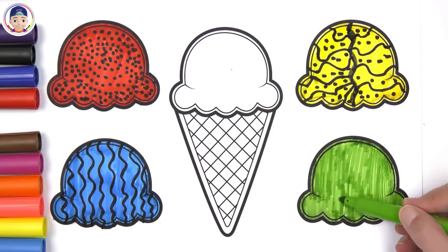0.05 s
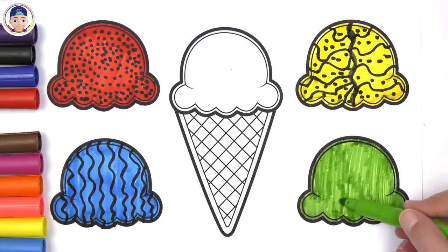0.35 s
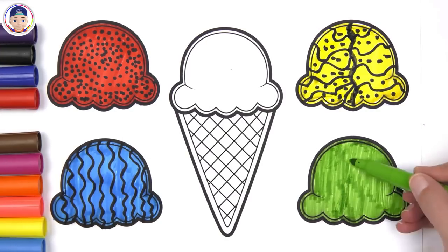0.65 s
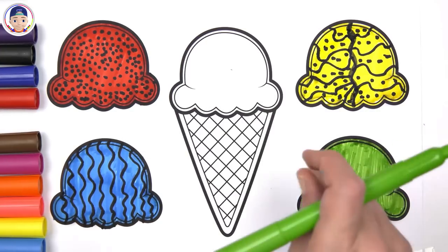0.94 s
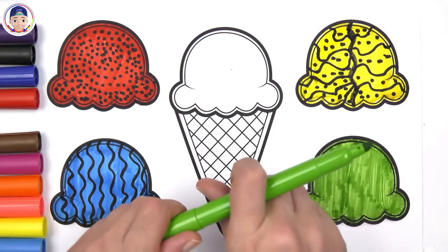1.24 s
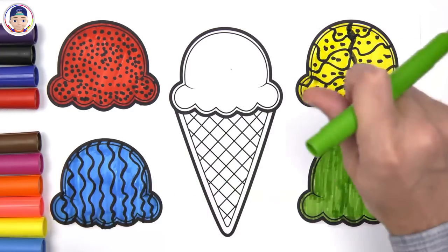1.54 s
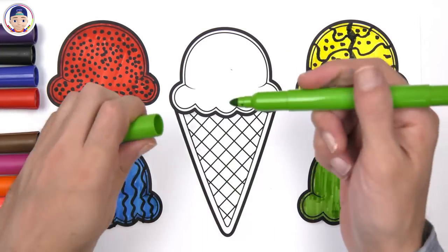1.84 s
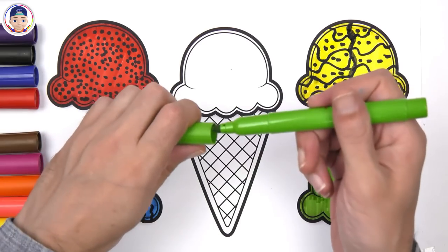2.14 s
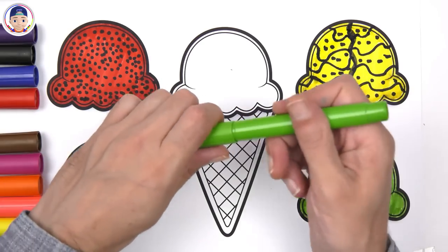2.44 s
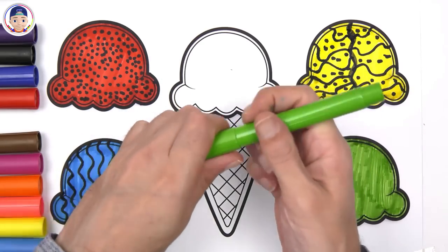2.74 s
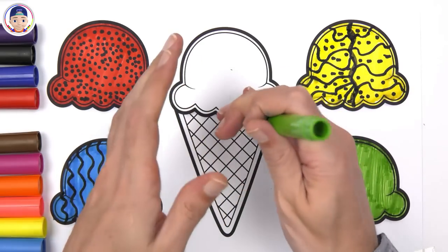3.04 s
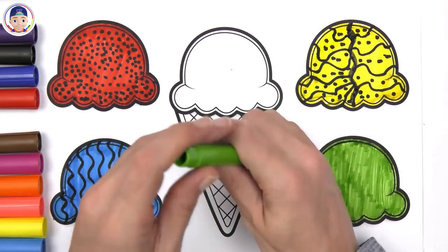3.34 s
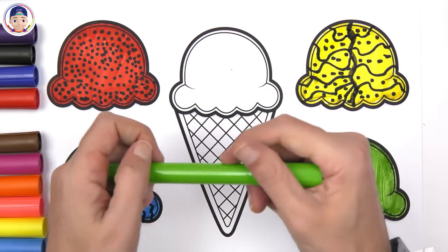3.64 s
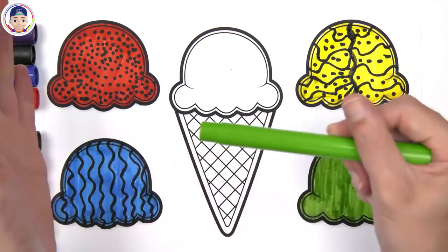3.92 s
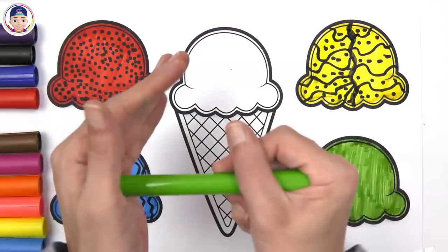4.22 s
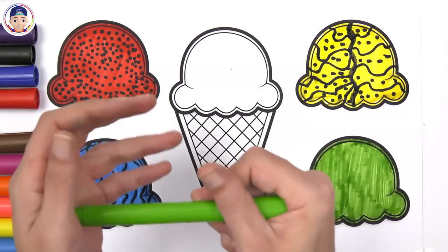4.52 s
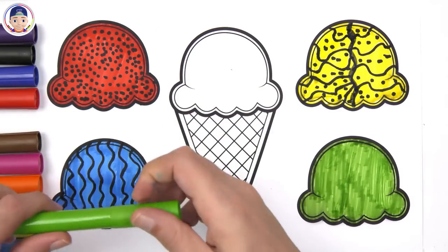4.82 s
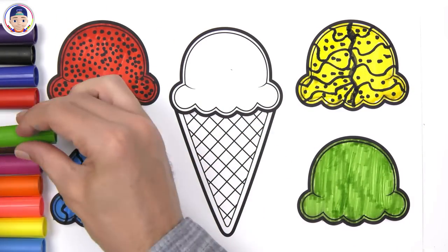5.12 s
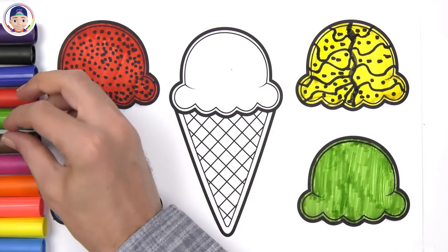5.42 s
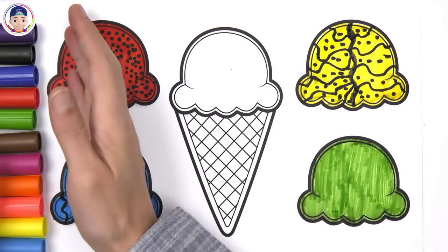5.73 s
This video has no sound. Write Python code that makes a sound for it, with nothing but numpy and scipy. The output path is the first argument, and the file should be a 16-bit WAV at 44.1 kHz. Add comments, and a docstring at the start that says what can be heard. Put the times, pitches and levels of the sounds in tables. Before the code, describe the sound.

A felt-tip marker scratches softly on paper in a few quick strokes. Its cap slips off the back with a small click and snaps sharply over the tip. The marker is rapped loudly on the table, patted three times with a palm, then dropped clattering among other markers. Hands rustle and push air across a close stereo microphone in a small room with a faint fan.

```python
"""A small room, close stereo microphone. A felt-tip marker scribbles on paper, its nib dragging over
the fibres. The cap is pulled off the back, snapped over the tip, rapped on the table and patted home
with the palm; then the marker is dropped into a row of others. Each contact rings damped modes and
echoes in the room. Hands rustle and push air across the microphone; a fan whirs faintly."""
import sys
import numpy as np
from scipy import signal
from scipy.fft import rfft, irfft
from scipy.io import wavfile
from scipy.ndimage import uniform_filter1d

SR = 44100
rng = np.random.default_rng(int(sys.argv[2]) if len(sys.argv) > 2 else 0)


def file_out(sig):
    """Save sig as 16-bit WAV at sys.argv[1]."""
    # one column per channel
    cols = np.atleast_2d(sig).T
    # limit, then scale
    lim = np.clip(cols, -1, 1)
    pcm = np.round(lim * 32767).astype(np.int16)
    wavfile.write(sys.argv[1], SR, pcm)


N = 263277
TIME_S, FREQ_HZ = np.arange(N) / SR, np.fft.rfftfreq(N, 1 / SR)

# Rubbing gestures. Each row: start in seconds, rise in seconds, hold in seconds, relative level in dB.
NIB_STROKES = [(-0.04, 0.12, 0.082, -51), (.17, 0.086, 0.08, -58), (.305, 0.067, 0.11, -51),
               (.47, 0.032, 0.13, -52), (.661, 0.022, 0.13, -50.5)]
NIB_CATCHES = [(.672, .004, .012, -50)]
CAP_SCRAPES = [(1.391, .003, .013, -55)]
SKIN_RUBS = [(1.09, 0.042, .015, -72.5), (1.545, .01, 0.0044, -63), (1.56, 0.045, 0.31, -75.5),
             (1.715, 0.0087, .004, -70), (2.56, 0.067, 0.21, -70.5), (2.74, 0.043, 0.035, -65),
             (2.84, .025, 0.0088, -61.5), (2.925, .012, .003, -68), (3.09, 0.039, 0.087, -56.5),
             (3.27, 0.014, 0.1, -58.5), (3.41, 0.038, 0.1, -60.5), (3.62, 0.053, .02, -69),
             (3.82, 0.02, .004, -63), (4.02, .02, 0.047, -59.5), (4.16, 0.034, .02, -73),
             (4.24, 0.022, 0.057, -66), (4.375, .015, .01, -68.5), (4.52, 0.018, 0.077, -66.5),
             (4.62, 0.023, 0.0044, -63.5), (4.7, 0.1, 0.024, -64.5), (5.09, .05, .14, -64)]
CLOTH_BRUSHES = [(5.42, 0.072, 0.1, -60.5), (5.645, 0.013, 0.099, -58), (5.82, 0.14, 0.049, -58)]
HEEL_BUMPS = [(.065, .017, 0.013, -31), (.8, 0.012, 0.077, -46.5), (5.625, 0.0069, 0.031, -38.5),
              (5.925, 0.052, .02, -33)]
# Faint breathy hisses (first and last row) and rising finger swishes (middle two).
# Each row: the four gesture columns, then first and last resonance in Hz.
HISSES_AND_SWISHES = [(1.68, .08, .12, -75.5, 4450, 4530), (2.818, 0.044, .014, -61, 5730, 7400),
                      (3.372, 0.041, 0.073, -68, 3900, 7100), (4.62, .15, 0.097, -68.5, 4360, 4700)]

# Blows. Each row: time in seconds, relative level in dB, contact hardness as a cutoff in Hz,
# factor on the mode frequencies, left over right in dB.
SLIP_BLOWS = [(1.3902, -32, 1470, 0.98, 2), (1.3935, -44, 12000, 0.94, -4), (1.4089, -27, 7000, 1.026, 2),
              (1.4103, -31, 14000, 1.25, -1), (3.1413, -13.5, 6640, 0.98, -3)]
SNAP_BLOWS = [(0.845, -44, 9000, 0.91, 2), (0.854, -42.5, 6000, 0.8, 2), (0.862, -47, 5000, 1.1, 2),
              (2.406, -29.5, 12000, 0.81, 0), (2.4137, -11, 6960, 1.014, -1.7),
              (2.429, -9.5, 6900, 0.97, 0.29), (2.5022, -36, 8000, 1.16, 0)]
SEAT_BLOWS = [(2.4591, -24.5, 12000, 0.87, 0), (2.464, -14.5, 8000, 0.91, -1),
              (2.4662, -33, 12000, 1.1, -1)]
RAP_BLOWS = [(3.1425, 4, 3012, 0.96, -1)]
PAT_BLOWS = [(4.0139, 0.5, 2530, 1.134, -0.61), (4.2321, 1.5, 3410, 0.97, -0.19),
             (4.4373, -2.5, 2950, 1.16, -1.2)]
DROP_BLOWS = [(5.2933, -10, 6950, 0.94, -6), (5.3146, -5.5, 6100, 0.97, -1.5),
              (5.4075, -1.5, 1450, .93, -1)]
TICK_BLOWS = [(0.856, -47.5, 9000, 1.06, 0), (2.698, -53, 5000, 0.84, 0), (2.726, -45.5, 4000, 0.47, 1),
              (2.793, -46.5, 7900, 1.05, 0.5), (3.125, -44, 5010, 0.82, -0.5),
              (3.803, -56.5, 7970, 0.97, -2), (4.087, -54, 14160, 1.2, 4), (4.298, -46.5, 14100, 1.5, 6),
              (5.335, -43, 9410, 1.0, 7), (5.3515, -46, 7060, 0.55, -6), (5.3722, -27, 6000, 0.92, -4),
              (5.378, -53, 6960, 0.65, -4), (5.4005, -25, 7000, 1.1, -2), (5.402, -21.5, 6900, 0.645, -15),
              (5.4335, -34, 7000, 0.96, -1), (5.63, -48, 3970, 0.77, -6)]

# Modes of the struck bodies. Each row: nominal frequency in Hz, relative level in dB, T60 in seconds.
BARREL_MODES = [(1000, 0, 0.012), (1800, -8, .005), (3888, 1.5, 0.011), (4470, -5.5, 0.0046),
                (5000, -2, 0.003), (7400, -3, 0.0061), (10100, -13, 0.002)]
OPEN_CAP_MODES = [(650, -23.5, 0.0173), (1820, -31, 0.0095), (2404, 2, .013), (3850, -57, 0.0094),
                  (4590, -40, 0.0048)]
SHUT_CAP_MODES = [(1307, 5, 0.0045), (1530, -1, 0.015), (2250, -0.5, 0.0055), (3860, -5.5, 0.019),
                  (5070, -3, 0.0017), (8600, -29.5, 0.00405)]
TABLE_MODES = [(114.6, -16, 0.23), (147, -10, 0.034), (240.7, -27, 0.3), (315, -6.5, 0.0084),
               (460, -14.5, 0.05), (690, -23.5, 0.14), (735, -37.5, 0.38), (818.5, 1, 0.022),
               (827, -27, 0.27), (875, -34.5, 0.059), (1168, -4.5, 0.031), (1211.6, -31.5, 0.11),
               (1460, -37.5, .2), (1596, -5.5, 0.027), (1730, -23.5, 0.041), (2100, -6.5, 0.0091),
               (2380, -18, .04), (2350, -17, 0.012), (4068, -21, 0.0024)]
PALM_MODES = [(52.7, -7.5, 0.037), (230, -16.5, 0.016), (1020, -3, 0.006), (1850, -1.5, 0.003),
              (3540, -2, 0.0016), (5950, -9.5, 0.00083)]
DROP_MODES = [(113.4, -23.5, 0.33), (205.5, -12.5, 0.11), (435, -9, 0.028), (653, -22, 0.033),
              (804, -14, 0.029), (1060, -6.5, 0.0093), (1202, -10.5, 0.035), (1594, 2.5, 0.011),
              (2290, -12.5, 0.034), (2560, -9, 0.02), (3380, 1, 0.007), (5300, -10.5, 0.011),
              (6540, -15, 0.012), (8600, -9, 0.0032)]

# Air pushed by the hand. Each row: peak time in seconds, level in dB, sway in Hz, left over right in dB.
AIR_PUFFS = [(1.467, -20.5, 9.5, 6.5), (2.472, -35.5, 26, 8), (3.139, -17.5, 29, -3.5),
             (4.014, -15.5, 15, -5.5), (4.232, -17.5, 14, -6.5), (4.437, -14.5, 18, -4),
             (5.408, -23, 64, -3), (5.65, -39.5, 37.2, -7)]

# Spectral shapes. Each row: frequency in Hz, relative density in dB.
FELT_SPECTRUM = [(1000, -3), (1900, -1.5), (2700, 2), (3500, -5.5), (4200, -2.5), (5000, 0), (6200, -4),
                 (8400, -4), (10800, -21), (11700, -4.5), (14000, -14), (16000, -16)]
SKIN_SPECTRUM = [(1500, -5.5), (2800, 0), (4500, -4), (7500, -1.5), (10500, -7), (13500, -2.5),
                 (16000, -15)]
SLEEVE_SPECTRUM = [(1120, -10.5), (1900, -6), (2000, -4.5), (4160, -5), (5200, -9), (5590, -7.5),
                   (9800, -12), (13200, -13), (16000, -20)]
RUMBLE_SPECTRUM = [(12, -54), (20, -8), (97, 2), (215, -13.5), (264, -8.5), (476, -21.5), (644, -28.5),
                   (900, -84), (1170, -30), (1980, -120)]
TABLETOP_SPECTRUM = [(50, -13), (120, 3), (190, -5.5), (380, -2), (560, -7), (800, -2.5), (1400, 0),
                     (2250, -12), (2900, -30), (6000, -44)]
FAN_SPECTRUM = [(12, -37), (20, 9), (60, -2.5), (107, -11.5), (142, -8.5), (241, -11), (270, -15.5),
                (399, -12), (459, -14), (607, -12.5), (1260, -21.5), (1660, -16), (2080, -25.5),
                (3840, -35), (16000, -47)]
ROOM_SPECTRUM = [(40, -8.5), (150, -3.5), (400, 5), (900, -5), (2500, -3), (5000, -0.5), (12000, 1.5),
                 (16000, -1)]

# Noise-driven resonances. Each row: centre in Hz, width in Hz, relative level in dB.
NIB_PEAKS = [(3500, 700, -9), (9750, 1350, -6)]
FAN_PEAKS = [(1610, 310, -81), (1537, 260, -86), (272.4, 27, -67.5)]
# Tones of the fan's whine. Each row: frequency in Hz, rms level in dB.
WHINE_TONES = [(1674, -70), (1723, -74.5)]

# Room decay. Each row: frequency in Hz, T60 in seconds.
ROOM_DECAY = [(120, 0.22), (400, 0.37), (1000, 0.38), (2700, 0.29), (7000, 0.27), (15000, 0.11)]
# Stereo likeness of the reflections. Each row: frequency in Hz, left-right correlation.
ROOM_CORRELATION = [(130, -0.44), (300, 0.18), (700, 0.74), (3000, 0.67), (7000, -0.69)]


def scribble(rasp_full_db=-50, rasp_power=1.4):
    """The nib drags over paper fibres, rasps on firm strokes and squeaks at a turn; the hand rumbles."""
    pressure = gestures(NIB_STROKES, sag_db=7, release_s=0.015)
    drag = friction(0.75, grip_db=2.5, grip_hz=49.5, grain_db=0.5)
    felt = drift_colour(colour(drag, FELT_SPECTRUM), patch_db=0.5)
    rasp = (pressure / amp(rasp_full_db)) ** (rasp_power - 1) * resonances(drag, NIB_PEAKS)
    squeak = gestures(NIB_CATCHES, sag_db=3, release_s=0.006) * unit(resonances(drag, NIB_PEAKS[:1]))
    hand_drag = friction(-0.082, grip_db=0.5, grip_hz=25, grain_db=-1)
    rumble = amp(1) * colour(hand_drag, RUMBLE_SPECTRUM)
    return sides(2.9) * (pressure * (felt + rasp) + squeak) + pressure * rumble


def cap_clicks():
    """The cap slips off the barrel, snaps over the tip and seats. Returns direct sound and room send."""
    slip = blows(SLIP_BLOWS, BARREL_MODES, crack_db=2, crack_s=0.0016, spread_rad=0.15, low_hz=629)
    snap = blows(SNAP_BLOWS, OPEN_CAP_MODES, crack_db=-17, crack_s=0.0039, spread_rad=0.088, low_hz=498)
    seat = blows(SEAT_BLOWS, SHUT_CAP_MODES, crack_db=-7, crack_s=0.0027, spread_rad=0.083, low_hz=533)
    return slip + snap + seat, amp(-15.5) * slip + amp(-14.5) * snap + amp(-13) * seat


def table_rap():
    """The capped marker strikes the table and rings its modes."""
    return blows(RAP_BLOWS, TABLE_MODES, crack_db=-28.5, crack_s=0.0048, spread_rad=0.22, low_hz=45)


def palm_pats():
    """A cupped palm pats the cap home: soft contact, short ring."""
    return blows(PAT_BLOWS, PALM_MODES, crack_db=-13, crack_s=0.002, spread_rad=0.1, low_hz=8.3, order=2)


def marker_drop():
    """The dropped marker hits the table three times."""
    return blows(DROP_BLOWS, DROP_MODES, crack_db=-7, crack_s=0.0014, spread_rad=0.49, low_hz=89)


def barrel_ticks(rattle_count=12):
    """Light contacts tick the barrel; it rattles against the other markers as it settles."""
    first_s, last_s = DROP_BLOWS[1][0], DROP_BLOWS[2][0]
    rattle = [(first_s + when * (last_s - first_s), -33 - 10 * soft, 7000, 0.56 + 0.61 * tune, -4)
              for when, soft, tune in rng.random((rattle_count, 3))]
    ticks = TICK_BLOWS + rattle
    return blows(ticks, BARREL_MODES, crack_db=2.5, crack_s=0.00052, spread_rad=0.22, low_hz=900.5)


def tabletop_shudder(t60_s=0.38, swell_s=0.0021):
    """After the rap the top and the things on it shudder in many close modes."""
    t = np.maximum(TIME_S - RAP_BLOWS[0][0], 0)
    envelope = amp(-21) * (1 - np.exp(-t / swell_s)) * decay(t, t60_s)
    return envelope * colour(stereo_noise(0.6), TABLETOP_SPECTRUM)


def stand_shake(hz=28, level_db=-19, t60_s=0.78):
    """The rap sets the microphone stand shaking."""
    t = np.maximum(TIME_S - RAP_BLOWS[0][0], 0)
    return amp(level_db) * decay(t, t60_s) * np.sin(2 * np.pi * hz * t)


def air_puffs(rise_s=0.025, fall_s=0.052):
    """Pressure builds as the hand closes in, then sways out; the channels are pushed opposite ways."""
    t, out = np.arange(-SR // 5, SR // 2) / SR, np.zeros((2, N))
    for peak_s, db, hz, pan_db in AIR_PUFFS:
        build = np.exp(-abs(t) / rise_s)
        sway = np.exp(-abs(t) / fall_s) * np.cos(2 * np.pi * hz * t)
        pressure = np.array([[1], [-1]]) * np.where(t < 0, build, sway)
        add(out, peak_s + t[0], amp(db) * sides(pan_db) * pressure)
    return out


def barrel_rubs():
    """Fingers rub the barrel; the cap scrapes along it before it pops off."""
    drag = friction(0.3, grip_db=1.5, grip_hz=45, grain_db=1)
    skin = drift_colour(colour(drag, SKIN_SPECTRUM), patch_db=1.5)
    fingers = gestures(SKIN_RUBS, sag_db=4, release_s=0.022)
    cap = gestures(CAP_SCRAPES, sag_db=1, release_s=0.002)
    return amp(3) * (fingers + cap) * skin


def sleeve():
    """Cloth brushes the paper."""
    drag = friction(0.69, grip_db=1.1, grip_hz=58.8, grain_db=1.5)
    cloth = drift_colour(colour(drag, SLEEVE_SPECTRUM), patch_db=0.2)
    return amp(3.5) * sides(-1.5) * gestures(CLOTH_BRUSHES, sag_db=5.5, release_s=0.1) * cloth


def hand_bumps():
    """The heel of the hand bumps the table: a low rumble."""
    rumble = colour(friction(0.13, grip_db=6.5, grip_hz=25.2, grain_db=2.5), RUMBLE_SPECTRUM)
    return sides(-3.9) * gestures(HEEL_BUMPS, sag_db=6, release_s=0.016) * rumble


def hisses_and_swishes(pole_width_hz=1400):
    """Noise in a gliding resonance: two faint breathy hisses near 4.5 kHz, two rising finger swishes."""
    glide = []
    for start_s, rise_s, hold_s, _, first_hz, last_hz in HISSES_AND_SWISHES:
        glide += [(start_s, first_hz), (start_s + rise_s + hold_s, last_hz)]
    centre_hz = np.interp(TIME_S, *np.transpose(glide))
    carrier = np.exp(2j * np.pi * np.cumsum(centre_hz) / SR)
    pole = np.exp(-np.pi * pole_width_hz / SR)
    noise = friction(0.6, grip_db=1, grip_hz=60, grain_db=1)
    baseband = signal.lfilter([1], np.poly([pole, pole]), noise / carrier)
    band = unit((carrier * baseband).real)
    return gestures([row[:4] for row in HISSES_AND_SWISHES], sag_db=3, release_s=0.012) * band


def fan(waver=0.002, waver_hz=13):
    """Steady whir with a thin whine: two slightly wavering tones in a band of noise."""
    tones = 0
    for hz, db in WHINE_TONES:
        phase = 2 * np.pi * np.cumsum(hz * (1 + waver * wander(waver_hz))) / SR
        tones += amp(db) * np.sqrt(2) * np.sin(phase)
    whir = amp(-55) * colour(stereo_noise(0.45), FAN_SPECTRUM)
    return sides(-0.5) * (whir + resonances(stereo_noise(0.27), FAN_PEAKS) + tones)


def room(x, gap_s=0.007):
    """Dense reflections swell after a short gap and die band by band."""
    t = np.arange(SR // 2) / SR
    taps = rng.choice([-1, 1], (2, len(t))) * (rng.random((2, len(t))) < 0.15)
    hz, delay_s, (left, other) = signal.stft(taps, SR, nperseg=256)
    shared = np.clip(curve(ROOM_CORRELATION, hz), -1, 1)[:, None]
    bands = np.array([left, shared * left + np.sqrt(1 - shared ** 2) * other])
    gain_db = curve(ROOM_SPECTRUM, hz)[:, None] - 60 * delay_s / curve(ROOM_DECAY, hz)[:, None]
    tail = signal.istft(bands * amp(gain_db), SR, nperseg=256)[1][:, :len(t)]
    tail *= 1 - np.exp(-(t / gap_s) ** 2)
    return signal.fftconvolve(x, tail / np.linalg.norm(tail[0]), axes=1)[:, :N]


def blows(rows, modes, crack_db, crack_s, spread_rad, low_hz, order=1):
    """Each blow rings the modes and adds a crack; a soft contact cuts treble, a small body cuts bass."""
    t, out = np.arange(SR // 3) / SR, np.zeros((2, N))
    for start_s, db, hard_hz, tune, pan_db in rows:
        ring = 0
        for k, (hz, mode_db, t60_s) in enumerate(modes):
            # the channels hear a mode out of step, most of all the low ones that shake the stand
            skew_rad = spread_rad + 0.55 / (1 + (hz / 400) ** 2)
            phase = 2 * np.pi * hz * tune * t + skew_rad * np.array([[1], [-1]]) * np.minimum(t * hz, 1)
            polarity = -(-1) ** k  # neighbouring modes swing opposite ways
            ring += polarity * amp(mode_db) * decay(t, t60_s) * np.sin(phase)
        crack = amp(crack_db) * stereo_noise(0.13, size=len(t)) * np.exp(-t / crack_s)
        ring = signal.lfilter(*signal.butter(order, hard_hz, fs=SR), ring)
        crack = signal.lfilter(*signal.butter(1, hard_hz, fs=SR), crack)
        radiated = signal.lfilter(*signal.butter(2, low_hz, "high", fs=SR), ring + crack)
        add(out, start_s, amp(db) * sides(pan_db) * radiated)
    return out


def gestures(rows, sag_db, release_s):
    """Gain of gestures: each rises, sags while held and lets go."""
    gain = 0
    for start_s, rise_s, hold_s, db in rows:
        t = TIME_S - start_s - rise_s
        press = np.clip(1 + t / rise_s, 0, 1)
        held = amp(db - sag_db * np.clip(t / hold_s, 0, 1))
        release = np.exp(-np.maximum(t - hold_s, 0) / release_s)
        gain += press * held * release
    return gain


def friction(correlation, grip_db, grip_hz, grain_db):
    """Fibres catch and let go: fine grains under an uneven grip."""
    return stereo_noise(correlation) * amp(grip_db * wander(grip_hz) + grain_db * wander(1000))


def drift_colour(x, patch_db, patch_frames=14, patch_bins=12):
    """The colour of a rub drifts as the point of contact moves."""
    bands = signal.stft(x, SR, nperseg=512)[2]
    patches = uniform_filter1d(rng.standard_normal(bands.shape[1:]), patch_bins, 0)
    patches = unit(uniform_filter1d(patches, patch_frames, 1))
    return unit(signal.istft(bands * amp(patch_db * patches), SR, nperseg=512)[1][:, :N])


def resonances(x, peaks):
    """Noise through steep parallel peaks."""
    return sum(amp(db) * unit(irfft(rfft(x) / (1 + (2 * (FREQ_HZ - hz) / width_hz) ** 4), N))
               for hz, width_hz, db in peaks)


def stereo_noise(correlation, size=N):
    left, other = rng.standard_normal((2, size))
    return np.array([left, correlation * left + np.sqrt(1 - correlation ** 2) * other])


def wander(hz):
    """Random drift, rms 1."""
    return unit(irfft(rfft(rng.standard_normal(N)) * np.exp(-(FREQ_HZ / hz) ** 2), N))


def colour(x, spectrum):
    return unit(irfft(rfft(x) * amp(curve(spectrum, FREQ_HZ)), N))


def curve(points, hz):
    knots_hz, values = np.transpose(points)
    return np.interp(np.log(hz + 1), np.log(knots_hz + 1), values)


def decay(t, t60_s):
    return np.exp(-np.log(1000) * t / t60_s)


def amp(db):
    return 10 ** (np.asarray(db) / 20)


def unit(x):
    return x / np.sqrt(np.mean(x ** 2) + 1e-20)


def sides(pan_db):
    return amp([[pan_db / 2], [-pan_db / 2]])


def add(mix, start_s, sound):
    part = mix[:, round(start_s * SR):][:, :sound.shape[1]]
    part += sound[:, :part.shape[1]]


def scene():
    """Sum of all sources; only the knocks feed the room."""
    rustle = scribble() + barrel_rubs() + sleeve() + hand_bumps() + hisses_and_swishes()
    cap, cap_send = cap_clicks()
    rap, pats, drop, ticks = table_rap(), palm_pats(), marker_drop(), barrel_ticks()
    send = cap_send + amp(-13.5) * (rap + pats) + amp(-9.5) * drop + amp(-20) * ticks
    knocks = cap + rap + pats + drop + ticks + room(send)
    return rustle + knocks + tabletop_shudder() + stand_shake() + air_puffs() + fan()


def record(dry):
    """The hardest knocks overload at full scale; a low-pass limits the band."""
    cutoff_hz = 16200
    lowpass = signal.firwin(255, cutoff_hz, window=("kaiser", 7), fs=SR)
    return signal.oaconvolve(np.clip(dry, -1, 1), lowpass[None], "same")


dry = scene()
out = record(dry)
file_out(out)
```